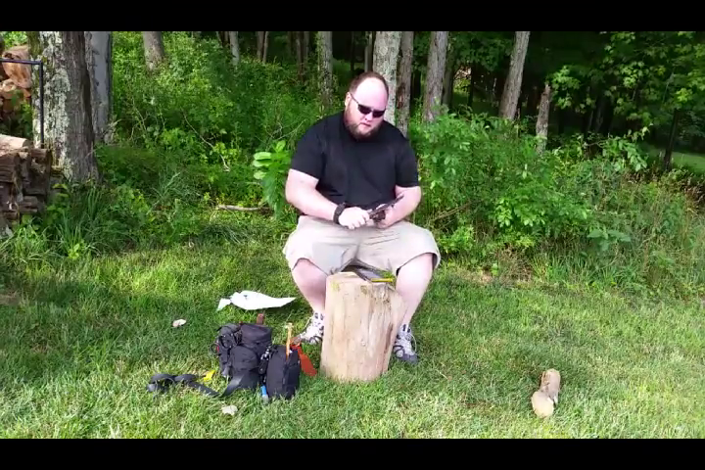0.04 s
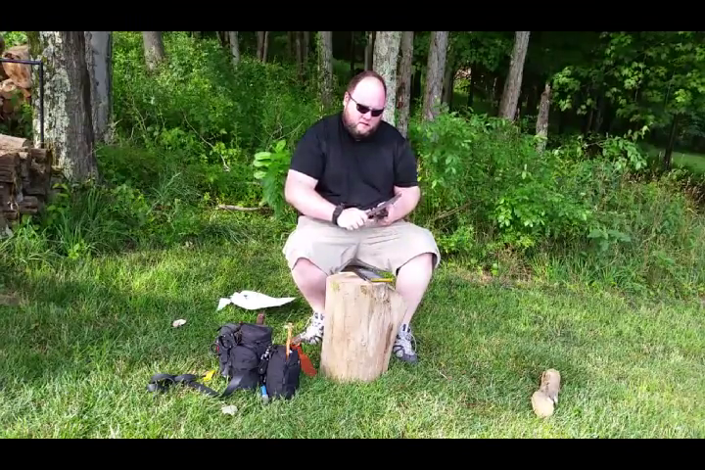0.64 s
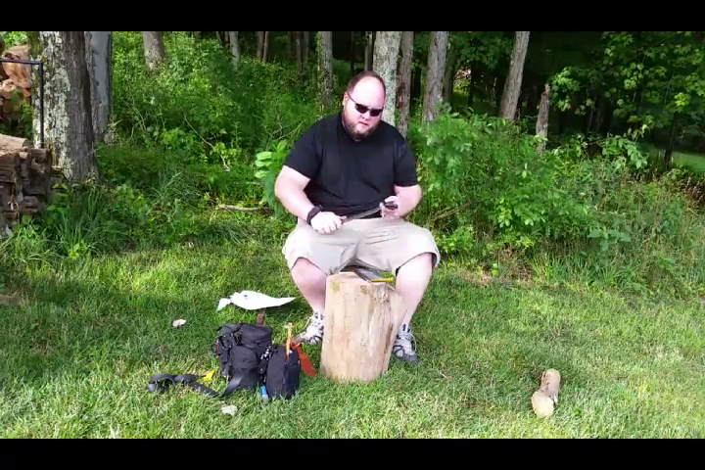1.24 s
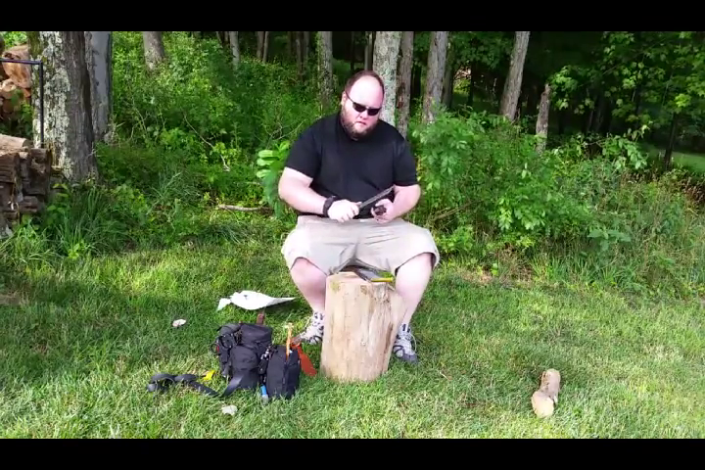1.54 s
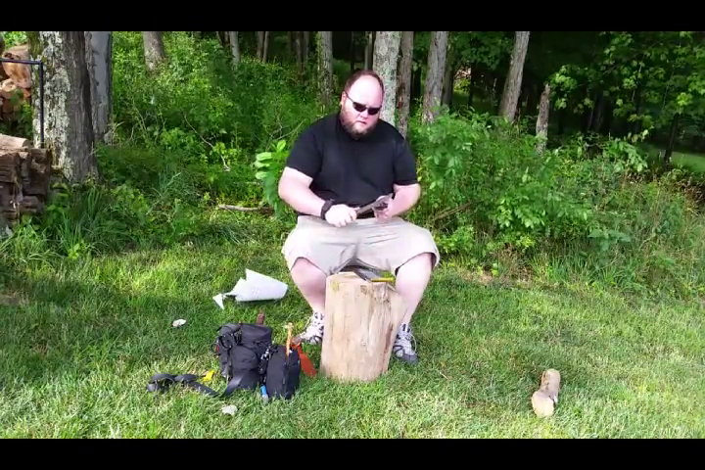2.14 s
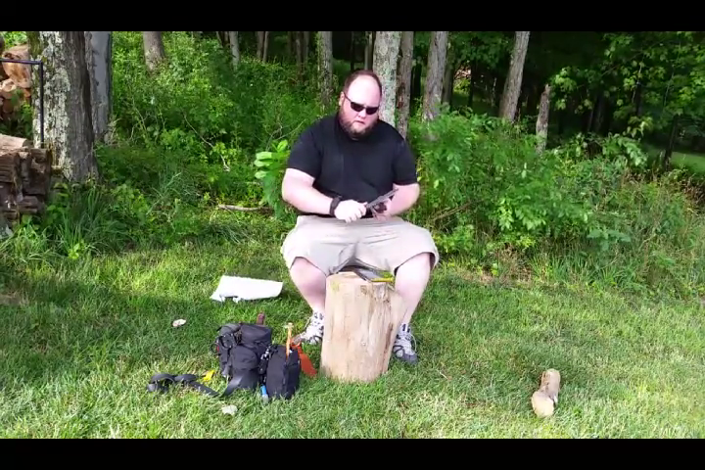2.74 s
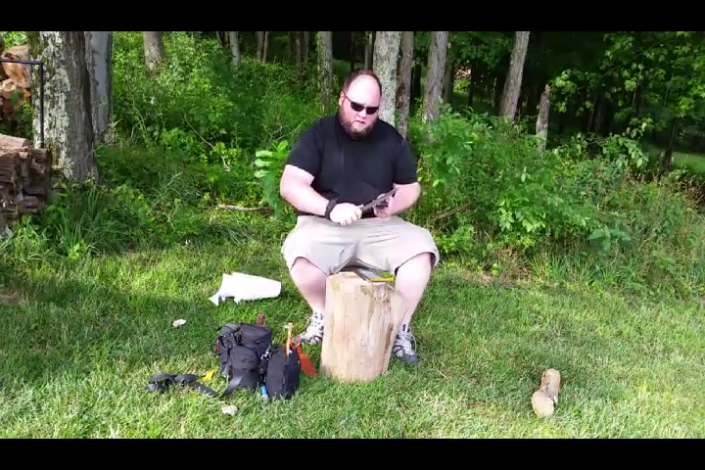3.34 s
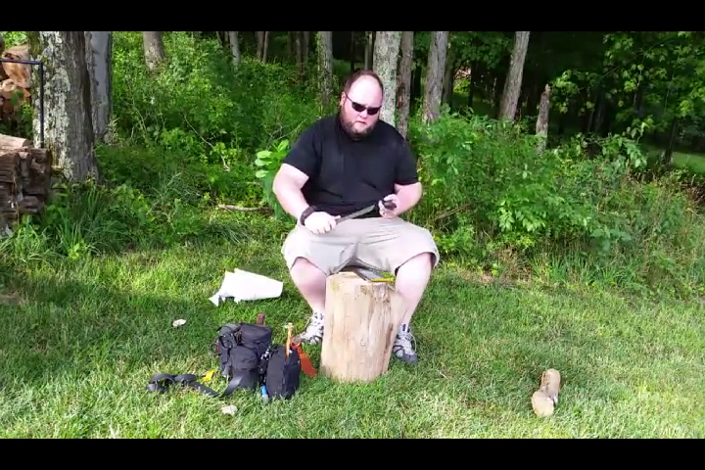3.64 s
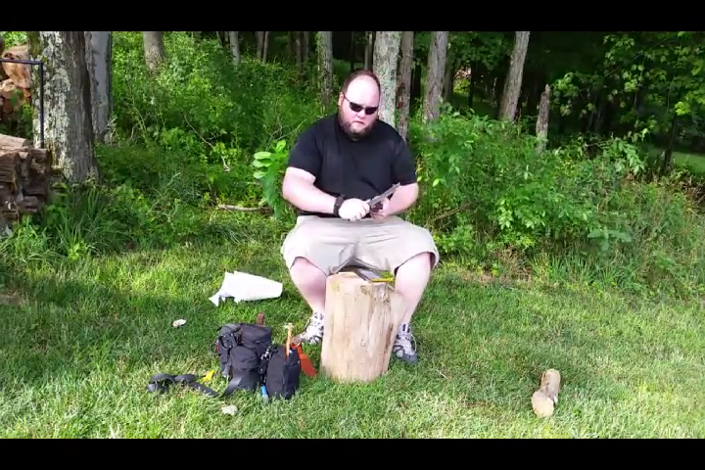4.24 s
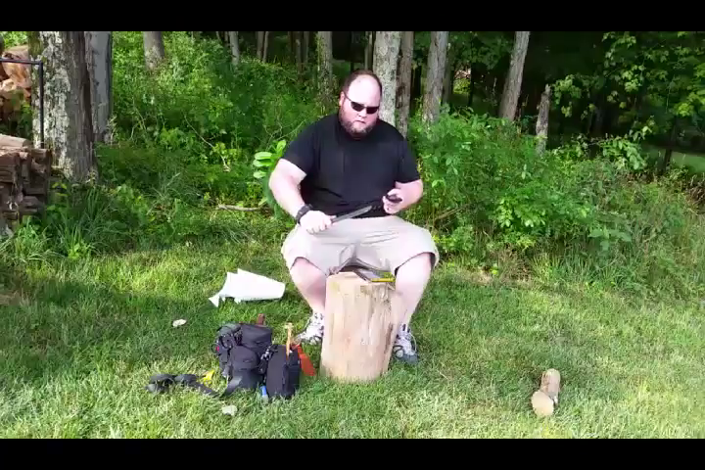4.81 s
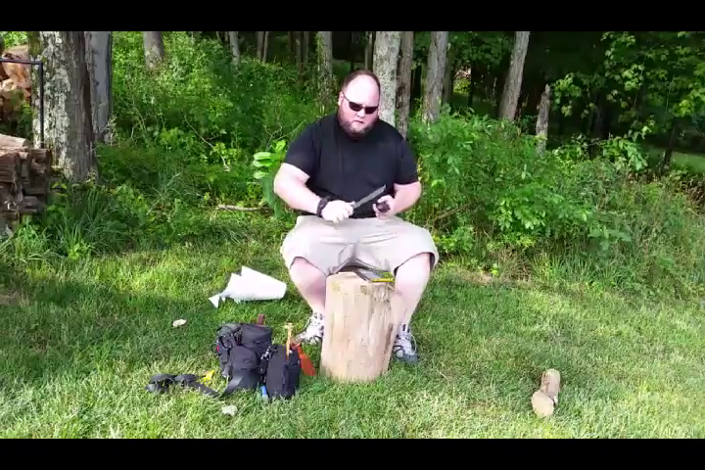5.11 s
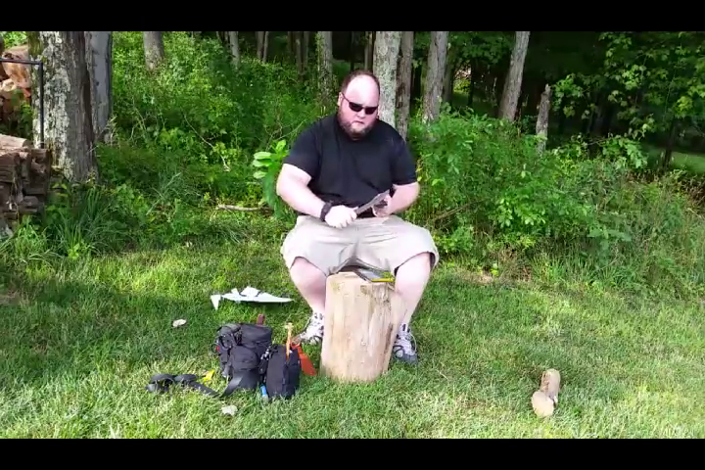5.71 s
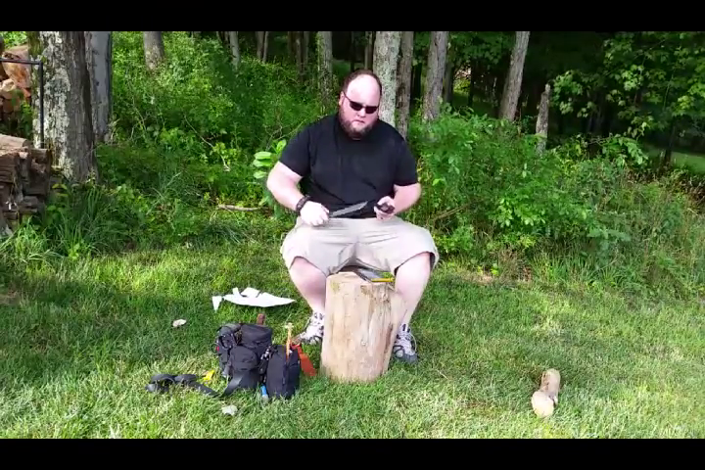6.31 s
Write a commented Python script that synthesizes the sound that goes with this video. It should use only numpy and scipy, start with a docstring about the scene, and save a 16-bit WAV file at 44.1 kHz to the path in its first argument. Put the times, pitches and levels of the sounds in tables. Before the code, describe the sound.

Gusts of wind buffet the microphone with an uneven low rumble, strongest near the middle. Close by, steel ticks on a sharpening stone and scrapes across it in five slow, gritty strokes, about one a second, each brightening into a slight ring. Behind this, in the open air, are a soft hiss of foliage, one faint far-off howl, perhaps a dog, and a few quiet bird chirps.

```python
"""Wind buffets the microphone's two ports throughout, while close by steel ticks on a small stone.
On a lawn at the edge of a wood, a knife is drawn five times along the hand-held stone: the edge is
set down, rasps over the grit, rings more as the blade comes free and skids off at the tip.
Farther off, leaves hiss, a small bird chirps and a distant animal, perhaps a dog, calls once."""
import sys
import numpy as np
from scipy import signal
from scipy.fft import rfft, irfft, next_fast_len
from scipy.io import wavfile
from scipy.ndimage import uniform_filter1d

SR = 44100
rng = np.random.default_rng(int(sys.argv[2]) if len(sys.argv) > 2 else 0)


def to_wav(s):
    """Save 16-bit WAV."""
    ch = np.atleast_2d(s).T  # columns
    pcm = np.round(np.clip(ch, -1, 1) * 32767)  # PCM
    wavfile.write(sys.argv[1], SR, pcm.astype(np.int16))


N = 280564
TIME = np.arange(N) / SR
FFT_SIZE = next_fast_len(N + SR)
FREQ = np.arange(FFT_SIZE // 2 + 1) * SR / FFT_SIZE + 1e-3
TOP_HZ = 14470  # the recorder's upper limit

# The blade on the stone, the first stroke in two parts; the last three levels hold at the crest:
# start_s, end_s, bite_s, bite_boost_db, rasp_db, blade_db, ring_db
STROKES = [(0.66, 0.842, 0.697, 8, -53.5, -61, -60), (0.955, 1.304, 1.08, 7, -45.5, -52.5, -42),
           (1.96, 2.348, 2.005, 5.5, -44, -48.5, -40), (3.317, 3.529, 3.44, 2, -47, -49.5, -47.5),
           (4.45, 4.795, 4.515, 4.5, -44, -48, -40.5), (5.54, 5.953, 5.775, 2, -47, -51, -44.5)]
# Rise towards the tip, a row each for rasp, blade and ring: growth_db, time_constant_s
TIP_GROWTH = [(14.7, 0.12), (9.3, 0.2), (55.6, .34)]
# Spectrum of the grit's rasp: frequency_hz, level_db
RASP_COLOUR = [(500, -24), (1000, -13), (1600, -9), (2100, -4), (2600, -3), (3700, 1.5), (5500, -.5),
               (7200, -4), (8500, -12), (9800, -9), (12800, -19), (14600, -19)]
# Modes of the blade pressed on the stone: pitch_hz, width_hz, level_db
BLADE_MODES = [(1310, 94, -12), (2010, 190, 3), (2764, 215, 1.5), (3690, 270, -4.5), (4154, 92, 0.5),
               (4310, 44, -15), (4940, 120, -4), (5410, 160, -6)]
# Its highest modes, which the hand hardly damps: pitch_hz, width_hz, level_db
RING_MODES = [(9530, 260, -11), (10350, 240, -11), (10810, 70, -10), (11680, 60, -11), (11950, 10, 5),
              (12140, 140, -5), (13800, 45, 3), (13950, 200, -7)]
# The tip skids off the stone: middle_s, length_s, level_db, centre_hz
SKIDS = [(1.294, 0.018, -46.5, 3980), (2.298, 0.031, -40.5, 3240), (2.365, .024, -38.5, 9500),
         (3.511, 0.037, -48, 7500), (3.587, 0.021, -44.5, 6450), (4.771, .017, -36, 3720),
         (5.934, .018, -38, 4600)]
# The edge sticks and slips: middle_s, length_s, pitch_hz, level_db
SQUEALS = [(1.105, 0.028, 5470, -52), (2.327, 0.01, 2890, -49), (2.332, 0.016, 4470, -49),
           (2.36, .026, 2820, -40), (3.519, .018, 5560, -44), (3.589, 0.013, 4920, -41)]
# The edge is set down: start_s, level_db, centre_hz
TICKS = [(0.177, -36.5, 2680), (1.935, -32, 2900), (3.114, -40.5, 2040), (4.236, -35, 3700),
         (5.4005, -33.5, 3520)]
# Knock of the stone in the hand: pitch_hz, width_hz, level_db
STONE_MODES = [(2050, 260, 0), (2450, 400, -3), (3600, 500, -1), (5800, 2500, -4)]

# Wind on the microphone ports between gusts: time_s, left_db, right_db
WIND_LEVELS = [(0, -45, -48.5), (.35, -45, -35), (.75, -36, -38.5), (1.3, -30.5, -29.5), (1.65, -30, -25),
               (2.0, -36, -24), (2.4, -25, -21.5), (2.8, -27.5, -37), (3.3, -25.5, -22),
               (3.6, -47.5, -36.5), (4.0, -45.5, -33.5), (4.7, -51, -39), (5.1, -36.5, -36.5),
               (5.3, -47, -50), (5.85, -65, -55), (6.36, -42, -42.5)]
# Spectrum of the turbulence: frequency_hz, level_db
WIND_COLOUR = [(12, -35), (20, -11.5), (54, 3), (110, 1.5), (174, -6), (600, -53), (780, -60), (1320, -120)]
# Gusts across the microphone: middle_s, length_s, large_eddies_db, left_minus_right_db, small_eddies_db
GUSTS = [(0.353, 0.04, -32, -13, -68), (0.519, 0.054, -27, 1.5, -59), (0.633, 0.043, -27.5, 16, -66),
         (0.774, .04, -25, 17, -55), (0.839, 0.11, -20, -12.5, -51), (0.967, 0.064, -22, -1, -60),
         (1.212, 0.056, -22, 3.5, -53), (1.42, .07, -33, -20, -65), (1.67, 0.039, -21, -23, -57),
         (1.787, 0.043, -17.5, -3, -49), (1.904, 0.076, -20, -30, -36.5), (2.234, 0.037, -24.5, 7, -26.5),
         (2.35, 0.15, -18, 1, -38.5), (2.535, 0.058, -16, -23, -37), (2.707, 0.079, -26, -1, -52),
         (2.948, 0.068, -22, -19, -45), (3.159, 0.048, -24.5, -3, -50), (3.319, 0.067, -16, -10, -43),
         (3.469, .07, -29, -13, -55), (3.715, 0.11, -28.5, -27, -50.5), (3.822, 0.11, -31, -32, -45),
         (3.947, .07, -29.5, -4, -53), (4.218, 0.088, -30, -34, -44), (4.573, 0.16, -29, -30, -48.5),
         (4.704, .05, -33.5, -27, -56), (4.887, 0.064, -33, 20, -67), (5.448, 0.1, -31.5, 21, -68),
         (6.011, 0.087, -31, -32, -59.5), (6.206, 0.11, -29, 25, -56.5)]
# Single eddies hit a port: time_s, level_db, pitch_hz, left_minus_right_db, crest_db
THUMPS = [(0.248, -17.5, 79.4, 5, -40), (0.585, -18.5, 85, 16, -44), (0.808, -21.5, 100, -15, -35),
          (1.674, -15.5, 129, -29, -46), (1.781, -16, 104, -21, -38), (1.875, -10.5, 72, -27, -15),
          (1.927, -6.5, 129, -36, -28), (2.058, -8.5, 110, -24, -13.5), (2.156, -16, 121, -26, -25.5),
          (2.219, -9.5, 104, 3, -20.5), (2.236, -13.5, 133, 6, -29), (2.553, -13, 137, -30, -35),
          (2.793, -25.5, 179, 29, -27.5), (2.956, -16, 88.5, -14, -32), (3.287, -9.5, 97, -16, -29),
          (3.335, -9, 122, -18, -41), (3.787, -16.5, 110, -36, -28), (3.824, -15, 86, -23, -26),
          (4.1645, -20, 297, -35, -36), (4.19, -17, 129, -40, -27), (4.272, -18, 103, -23, -27),
          (4.568, -15.5, 97, -36, -30), (4.623, -20.5, 128, -36, -25.5), (6.045, -19.5, 106, -33, -55)]

# Hiss of the far foliage: time_s, level_db
LEAF_LEVELS = [(0, -62), (.28, -57.5), (1.15, -51), (1.85, -53), (2.5, -51), (4.85, -52.5), (5.55, -56.5),
               (5.9, -52.5), (6.36, -54)]
# Spectrum of that hiss: frequency_hz, level_db
LEAF_COLOUR = [(410, -12), (700, 2), (765, -2), (836, -2), (1060, -6.5), (1540, -5.5), (1960, -6.5),
               (3130, -1.5), (4030, -1), (5750, 0.5), (8510, -13), (10000, -10), (14500, -23)]
# The bird in the trees: start_s, length_s, start_hz, end_hz, level_db
CHIRPS = [(2.64, .026, 3820, 3040, -54), (2.682, 0.019, 3160, 3100, -54), (2.786, .028, 3020, 3770, -50),
          (5.023, 0.025, 3900, 4580, -58), (5.082, .045, 3050, 4160, -53.5), (6.06, 0.035, 3660, 3520, -55),
          (6.096, .028, 4260, 3140, -53), (6.216, .034, 3546, 3440, -52.5), (6.248, .026, 3890, 3100, -52)]
# Arch of the distant call: time_s, pitch_hz, level_db
CALL_CONTOUR = [(.64, 386, -63), (.67, 438, -50.5), (.71, 495.6, -46), (.745, 499, -48.5), (.78, 503, -55),
                (.85, 480, -66), (.9, 470, -78)]
# The trees return the call: delay_s, level_db
CALL_ECHOES = [(.13, -12), (.25, -6), (.43, -12), (.7, -20)]
# The right port hears the scene more clearly: frequency_hz, left_minus_right_db
PORT_BALANCE = [(350, -5), (700, -13), (1200, -7), (2300, -4), (4200, -9.5), (7700, 1), (10000, -5),
                (14000, -7)]


def strokes():
    """Close to the microphone, grit rasps under the edge and shakes the blade into ringing."""
    rasp_gain, blade_gain, ring_gain = stroke_gains()
    rasp = through(grit(spread_db=3.5, judder_db=2.5) * rasp_gain, unit(colour(RASP_COLOUR)))
    drive = grit(spread_db=1.5, judder_db=1.2)
    modes = [undb(db) * resonance(hz, width) for hz, width, db in BLADE_MODES]
    modes_rms = np.sqrt(sum(np.mean(np.abs(mode) ** 2) for mode in modes))
    # the contact travels past each mode's nodes, so the modes swell and fade on their own
    blade = sum(through(drive * blade_gain * undb(2 * wander(10)), mode / modes_rms) for mode in modes)
    ring = through(drive * ring_gain, body(RING_MODES))
    return rasp + blade + ring


def stroke_gains(crest_before_end_s=0.062, bite_width_s=0.059, ramp_s=0.034):
    """Gains of rasp, blade and ring: each pass bites once and grows towards the tip."""
    gains = np.zeros((3, N))
    for start, end, bite_s, bite_db, *crest_db in STROKES:
        contact = np.clip(np.minimum(TIME - start, end - TIME) / ramp_s + .5, 0, 1)
        to_crest_s = np.maximum(end - crest_before_end_s - TIME, 0)
        pressure_db = bite_db * swell(bite_s, bite_width_s)
        for gain, db, (growth_db, growth_s) in zip(gains, crest_db, TIP_GROWTH):
            below_crest_db = growth_db * (1 - np.exp(-to_crest_s / growth_s))
            gain += contact * undb(db + pressure_db - below_crest_db)
    return gains


def grit(spread_db, judder_db, grains_per_s=14000):
    """Grains of the stone catch the edge as dense clicks of uneven size; the hand judders."""
    hits = rng.random(N) < grains_per_s / SR
    size = undb(spread_db * np.minimum(rng.exponential(size=N), 5))
    return unit(hits * size * rng.standard_normal(N)) * undb(judder_db * wander(130))


def skids():
    """The tip scratches hard as it leaves the stone and flicks the blade."""
    grains = grit(spread_db=1.3, judder_db=1)
    scratch, flick = 0, 0
    for middle, length, db, hz in SKIDS:
        force = undb(db) * swell(middle, length) * grains
        scratch += through(force, unit(resonance(hz, 0.93 * hz) * resonance(hz, 3 * hz)))
        flick += force
    return scratch + through(flick, undb(-2.5) * body(BLADE_MODES) + undb(-3) * body(RING_MODES))


def squeals():
    """The edge sticks and slips in step with one mode: brief, unsteady tones with overtones."""
    out = np.zeros(N)
    waver = 1 + 0.019 * wander(400)
    for middle, length, hz, db in SQUEALS:
        near = np.abs(TIME - middle) < length
        phase = 2 * np.pi * np.cumsum(hz * waver[near]) / SR
        tone = sum(undb(-3.5 * (k - 2)) * np.sin(k * phase) for k in range(1, int(TOP_HZ / hz) + 1))
        out[near] += undb(db) * swell(middle, length)[near] * tone
    return out


def ticks(decay_s=0.0041):
    """A few milliseconds of chatter as steel meets stone."""
    out, stone = 0, body(STONE_MODES)
    for start, db, hz in TICKS:
        age = np.maximum(TIME - start, 0)
        chatter = rng.standard_normal(N) * (age > 0) * np.exp(-age / decay_s)
        tick = through(chatter, stone * (resonance(hz, 0.47 * hz) + undb(-33)))
        out += undb(db) * tick / np.abs(tick).max()
    return out


def wind(flutter_db=5, bright_wind_db=-20.5):
    """Turbulence rumbles right on each port, duller when weak; hard gusts break into small eddies."""
    large_gain, small_gain = wind_gains()
    flow = np.array([rng.standard_normal(N) * undb(flutter_db * wander(30)) for _ in range(2)])
    # the speed of a gust bounds the pressure of its eddies
    pressure = np.tanh(through(flow, unit(colour(WIND_COLOUR))) / 2)
    rumble = unit(through(pressure, lowpass(255, order=10)))
    dull = through(rumble, lowpass(147, order=6))
    brightness = np.sqrt(np.minimum(large_gain / undb(bright_wind_db), 2))
    large_eddies = dull + (rumble - dull) * brightness
    small_eddies = through(flow, unit(resonance(258, 127) * resonance(167, 305) * lowpass(680, order=6)))
    breeze = through(rng.standard_normal((2, N)), unit(resonance(41, 35.5)))
    return large_eddies * large_gain + small_eddies * small_gain + undb(-50) * breeze


def wind_gains(small_eddies_db=-28.5):
    """Gains of large and small eddies at each port: gusts add their power to the underlying wind."""
    times, *ports = np.transpose(WIND_LEVELS)
    large_power = undb([np.interp(TIME, times, db) for db in ports]) ** 2
    small_power = large_power * undb(small_eddies_db) ** 2
    for middle, length, large_db, side_db, small_db in GUSTS:
        gust = (pan(side_db)[:, None] * swell(middle, length)) ** 2
        large_power += undb(large_db) ** 2 * gust
        small_power += undb(small_db) ** 2 * gust
    return np.sqrt(large_power), np.sqrt(small_power)


def thumps(crest_hz=233, delay_s=0.00408):
    """An eddy hits a port: one push with a sharper crest, and suction before and after it."""
    out = np.zeros((2, N))
    for time_s, db, hz, side_db, crest_db in THUMPS:
        near = np.abs(TIME - time_s) < .04
        for pulse_hz, pulse_db in (hz, db), (crest_hz, crest_db):
            phase = np.pi * pulse_hz * (TIME[near] - time_s - delay_s)
            push = undb(pulse_db) * (1 - 2 * phase ** 2) * np.exp(-phase ** 2)
            out[:, near] += pan(side_db)[:, None] * push
    return out


def leaves():
    """A smooth far hiss of foliage over the low murmur of open air."""
    times, db = np.transpose(LEAF_LEVELS)
    spectrum = colour(LEAF_COLOUR) / (1 + (600 / FREQ) ** 4)
    hiss = through(rng.standard_normal((2, N)) * undb(0.65 * wander(16)), unit(spectrum))
    air = through(rng.standard_normal((2, N)), unit(resonance(380, 310) * resonance(270, 790)))
    return hiss * undb(np.interp(TIME, times, db)) + undb(-64.5) * air


def bird():
    """Short, pure glides from back among the trees, more reflected than direct."""
    chirps = 0
    for start, length, start_hz, end_hz, db in CHIRPS:
        hz = np.interp(TIME, [start, start + length], [start_hz, end_hz])
        phase = 2 * np.pi * np.cumsum(hz) / SR
        chirps += undb(db) * swell(start + length / 2, 0.86 * length) * np.sin(phase)
    return chirps + scatter(chirps, t60_s=1.0, wet_db=1.5)


def far_call():
    """One arched howl; distance leaves two partials, and the wood answers it."""
    times, hz, db = np.transpose(CALL_CONTOUR)
    pitch_hz = np.interp(TIME, times, hz) * (1 + .016 * wander(90))
    phase = 2 * np.pi * np.cumsum(pitch_hz) / SR
    soft_gate = uniform_filter1d(1. * (TIME >= times[0]) * (TIME <= times[-1]), size=900)
    envelope = undb(np.interp(TIME, times, db)) * soft_gate
    call = envelope * (np.sin(phase) + undb(-7.5) * np.sin(2 * phase))
    echoes = sum(undb(echo_db) * np.interp(TIME - delay, TIME, call) for delay, echo_db in CALL_ECHOES)
    return call + echoes + scatter(call + echoes, t60_s=1.1, wet_db=-5)


def scatter(x, t60_s, wet_db):
    """Diffuse reflections, different at each port."""
    tail = rng.standard_normal((2, SR)) * np.exp(-np.log(1000) * TIME[:SR] / t60_s)
    tail /= np.sqrt(np.sum(tail ** 2, axis=1, keepdims=True))
    return undb(wet_db) * signal.fftconvolve(x[None], tail, axes=1)[:, :N]


def near_reflections(x):
    """Lap and ground blur the phase, differently at each port, and leave the colour alone."""
    impulse = 1. * (TIME == 0)
    response = 0.5 + rfft(scatter(impulse, t60_s=0.01, wet_db=0), FFT_SIZE)
    return through(x, response / np.abs(response))


def undb(db):
    """Decibels to gain."""
    return 10 ** (np.asarray(db) / 20)


def unit(x):
    """Scale to rms 1."""
    return x / np.sqrt(np.mean(np.abs(x) ** 2))


def through(x, response):
    """Filter a sound with a frequency response."""
    return irfft(rfft(x, FFT_SIZE) * response, FFT_SIZE)[..., :N]


def colour(points):
    """Response through (frequency_hz, level_db) points."""
    hz, db = np.transpose(points)
    return undb(np.interp(np.log(FREQ), np.log(hz), db))


def lowpass(hz, order):
    """Response that rolls off above hz."""
    return 1 / (1 + (FREQ / hz) ** order)


def resonance(hz, width_hz):
    """Response of one damped mode."""
    return 1 / (1 + 1j * (FREQ ** 2 - hz ** 2) / (FREQ * width_hz))


def body(modes):
    """Response of an object's summed modes, at unit power."""
    return unit(sum(undb(db) * resonance(hz, width) for hz, width, db in modes))


def wander(per_s):
    """Smooth random drift of rms 1 that turns about per_s times a second."""
    hold = max(int(SR / per_s), 1)
    steps = np.repeat(rng.standard_normal(N // hold + 1), hold)
    return unit(uniform_filter1d(steps, hold)[:N])


def swell(middle_s, length_s):
    """A smooth bump, length_s wide at half height."""
    bump = np.zeros(N)
    near = slice(*np.searchsorted(TIME, [middle_s - length_s, middle_s + length_s]))
    bump[near] = np.cos(np.pi / 2 * (TIME[near] - middle_s) / length_s) ** 2
    return bump


def pan(left_minus_right_db):
    """Left and right gains of constant power."""
    gains = undb(np.array([left_minus_right_db, -left_minus_right_db]) / 2)
    return gains / np.sqrt(np.mean(gains ** 2, axis=0))


def scene():
    """From the lawn: the knife close, the wood behind it, the wind on the microphone itself."""
    knife = strokes() + skids() + squeals() + ticks()
    off_trees = scatter(knife, t60_s=1.0, wet_db=-14.5)
    airborne = near_reflections(knife) + off_trees + leaves() + bird() + far_call()
    balance_db = 20 * np.log10(colour(PORT_BALANCE))
    return through(airborne, pan(balance_db)) + wind() + thumps()


def record(dry):
    """The recorder cuts the top steeply."""
    return signal.sosfilt(signal.ellip(12, .2, 80, TOP_HZ, fs=SR, output="sos"), dry)


dry = scene()
out = record(dry)
to_wav(out)
```